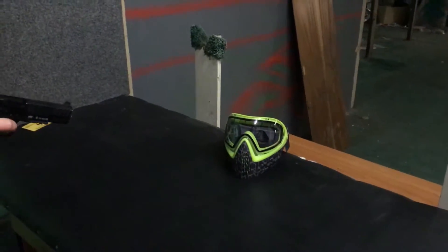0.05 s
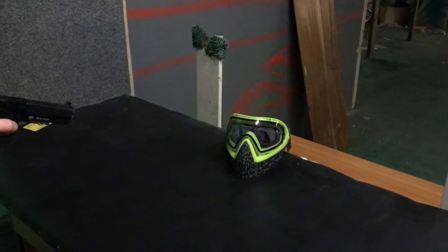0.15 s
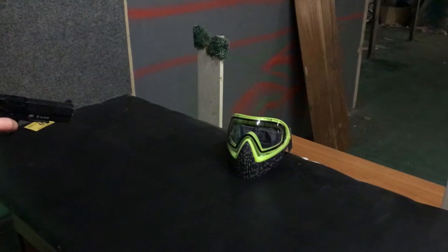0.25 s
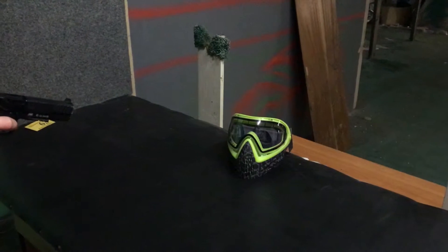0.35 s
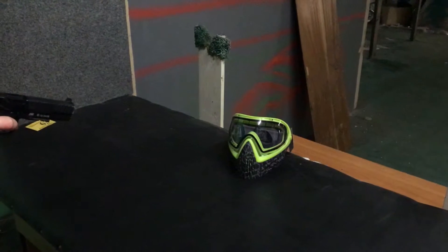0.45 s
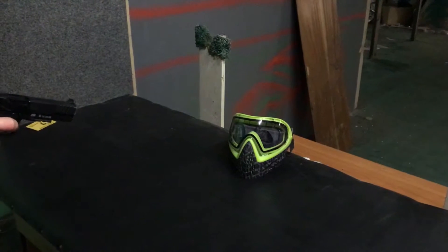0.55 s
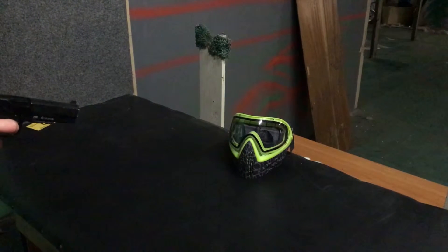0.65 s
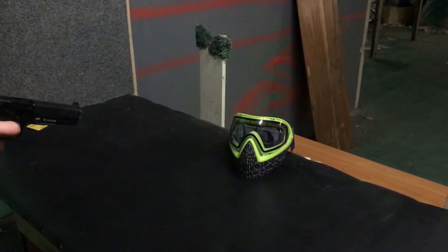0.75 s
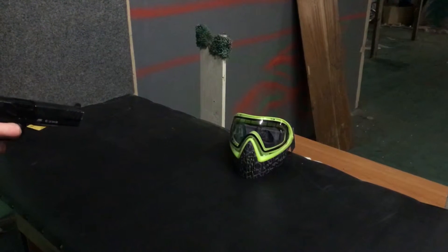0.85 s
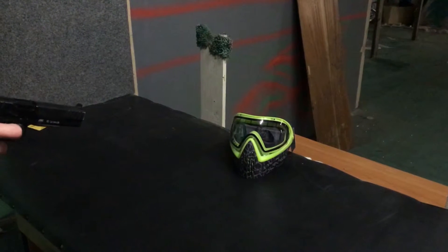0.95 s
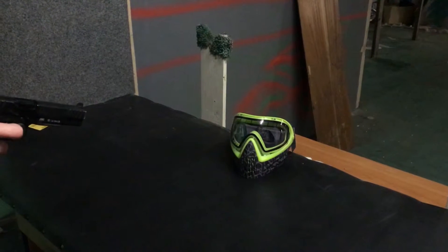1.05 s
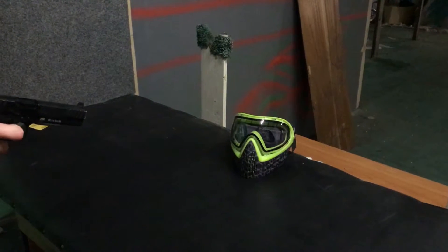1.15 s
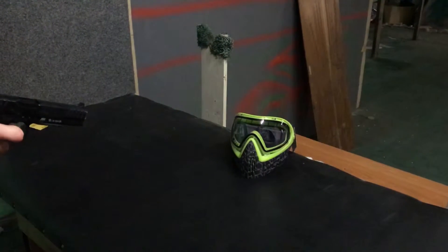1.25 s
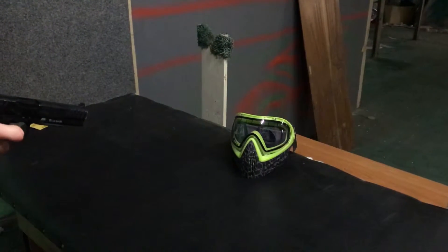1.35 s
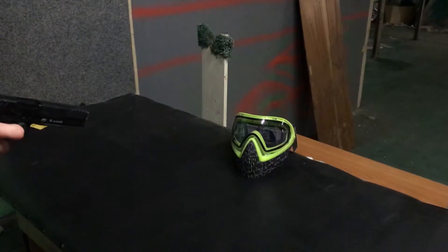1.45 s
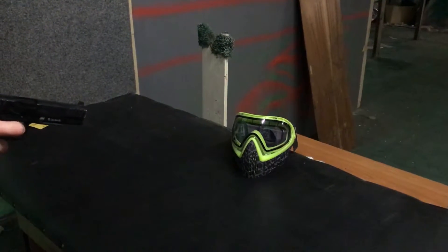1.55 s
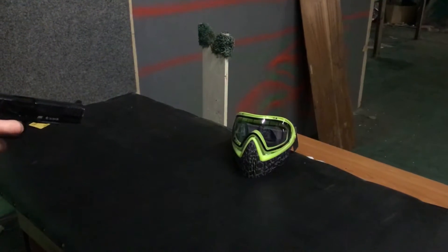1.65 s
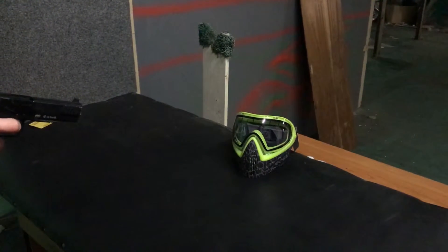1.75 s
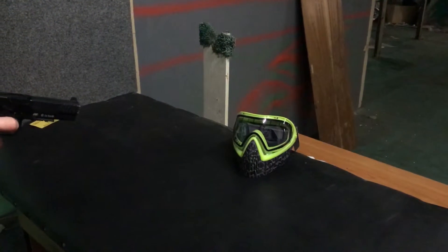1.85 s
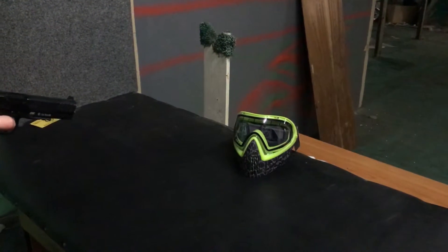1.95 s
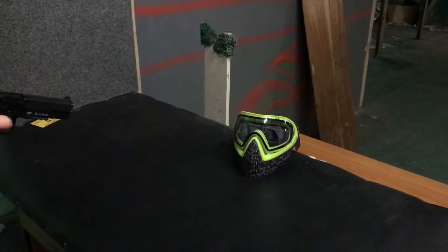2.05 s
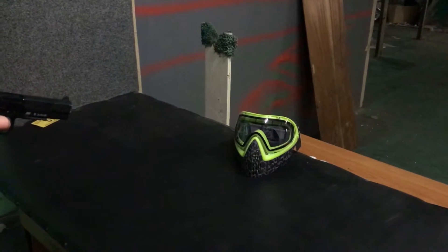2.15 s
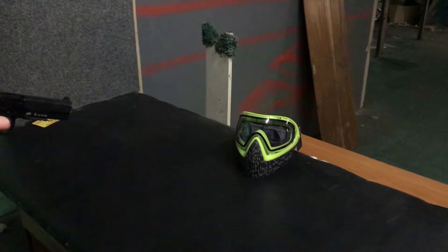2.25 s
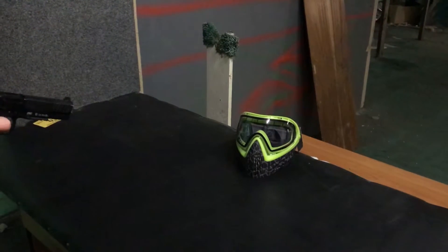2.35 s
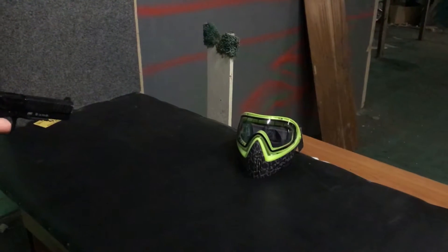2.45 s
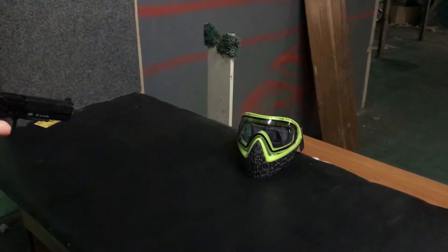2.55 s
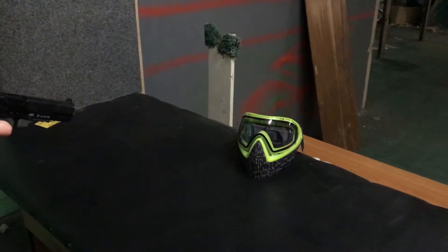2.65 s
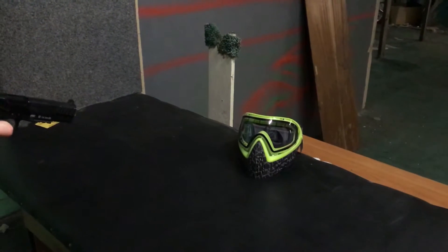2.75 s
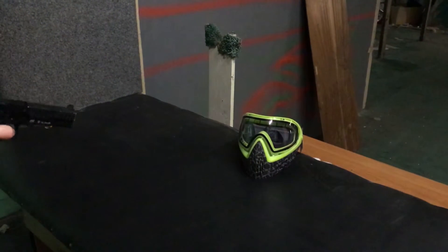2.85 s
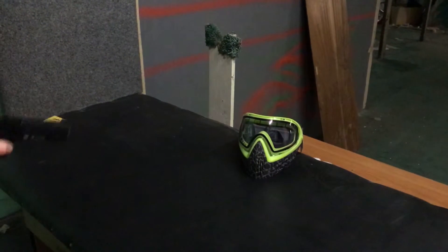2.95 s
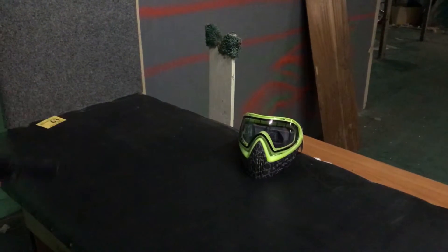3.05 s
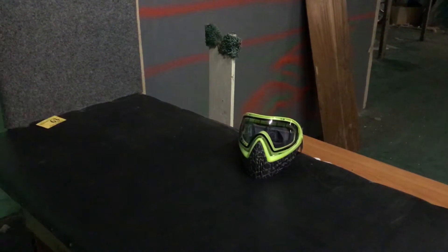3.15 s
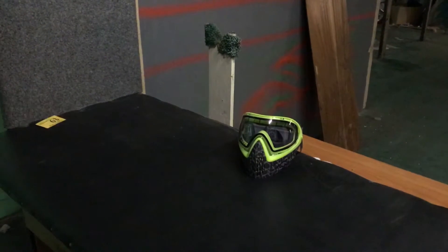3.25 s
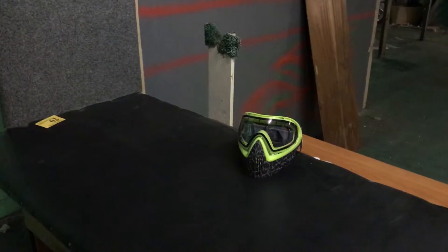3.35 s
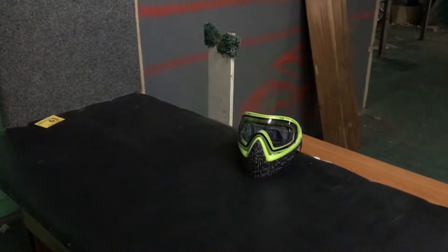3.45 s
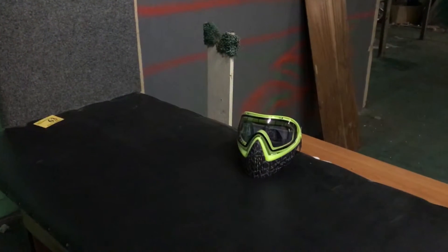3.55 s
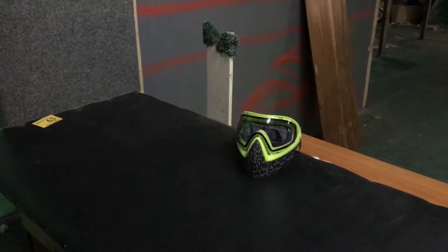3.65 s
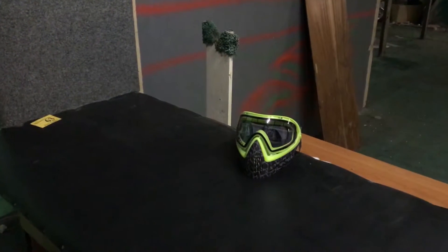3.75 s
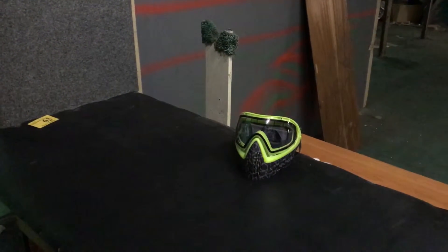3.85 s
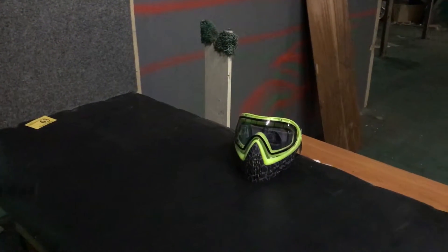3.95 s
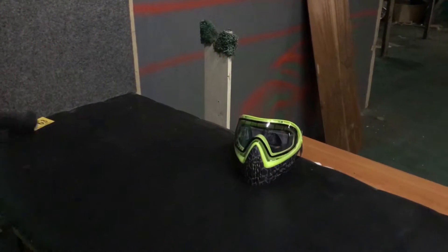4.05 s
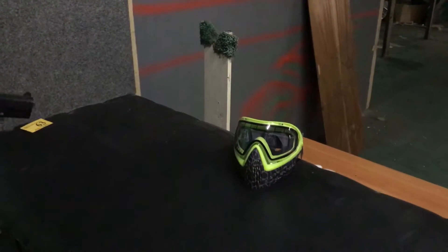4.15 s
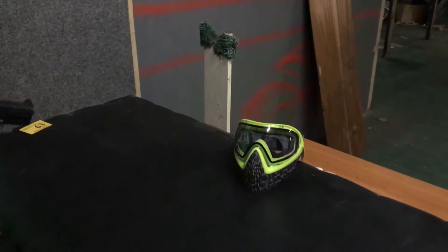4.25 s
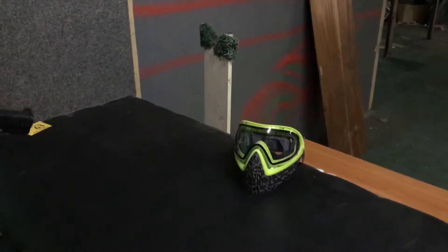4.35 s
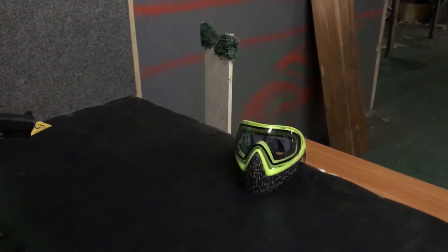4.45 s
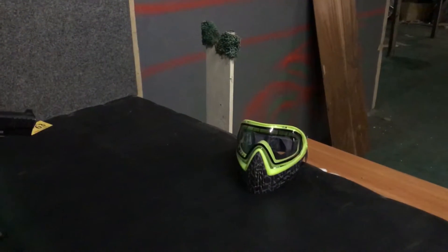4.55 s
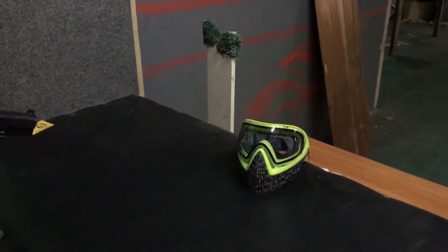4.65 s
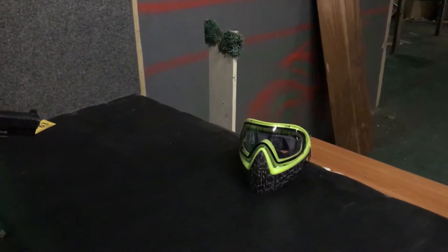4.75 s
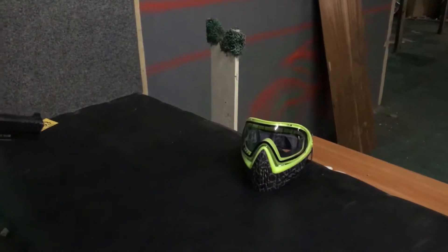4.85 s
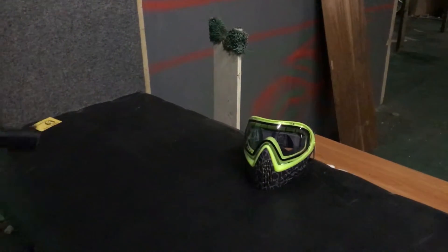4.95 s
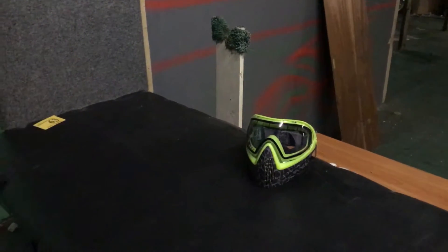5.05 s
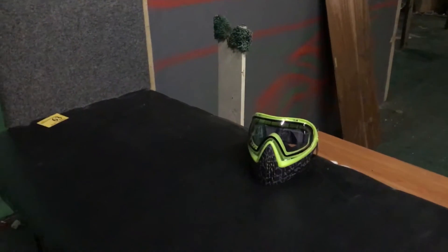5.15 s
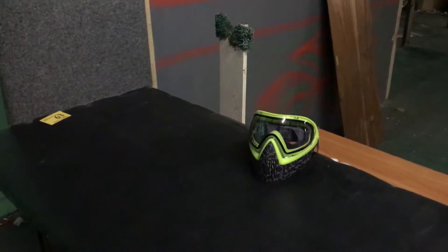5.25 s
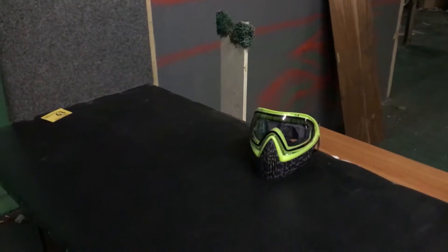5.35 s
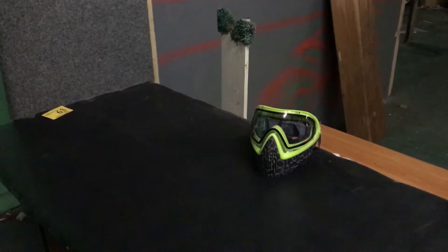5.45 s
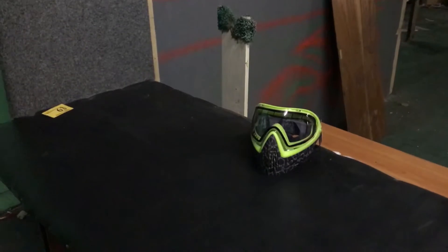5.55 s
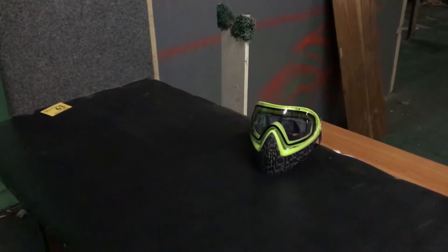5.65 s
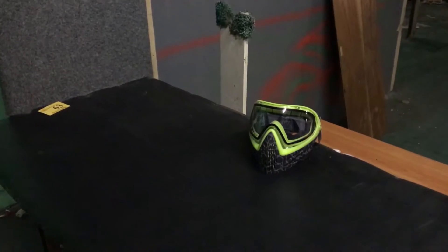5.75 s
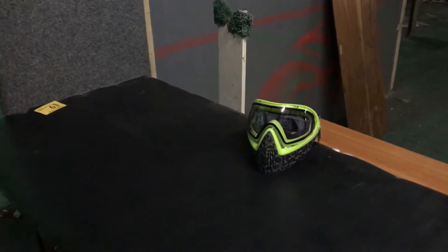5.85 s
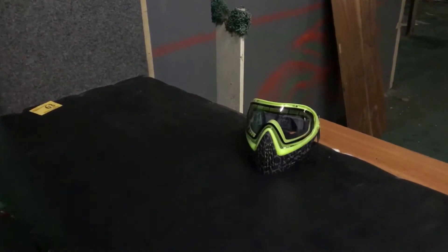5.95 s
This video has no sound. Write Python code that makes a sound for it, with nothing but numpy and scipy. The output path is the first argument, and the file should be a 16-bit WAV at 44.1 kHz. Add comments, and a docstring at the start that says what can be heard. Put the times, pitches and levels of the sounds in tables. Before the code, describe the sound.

As the echo of an earlier shot fades, a gas-powered toy pistol fires three times close to the microphone, with a longer pause before the last. Each shot is a sharp mechanical crack with a puff of gas and a low thump, echoing through an indoor hall. Pellets tick against distant things after each one. Faint trigger clicks and handling clacks fall between the shots, and a soft knock comes last, over a faint rumble and hiss.

```python
"""Gas pistol in an indoor range

A gas blow-back toy pistol fires three shots close by, while an earlier shot is still dying away.
Each is a quick run of hammer and slide impacts that ring the frame, with a jet of gas and a low thump;
the hall reverberates and its far end answers. Pellets tick against distant things, the pistol clacks in
the hand, the trigger clicks, and a soft knock sounds over a faint background rumble and hiss."""
import sys
import numpy as np
from scipy import signal
from scipy.fft import rfft, irfft
from scipy.io import wavfile
from scipy.ndimage import uniform_filter1d

SR = 44100
rng = np.random.default_rng(int(sys.argv[2]) if len(sys.argv) > 2 else 0)


def generate_wav(signal):
    """Clip the signal to [-1, 1] and save it as 16-bit WAV at the path in sys.argv[1]."""
    frames = np.transpose(np.atleast_2d(signal))
    scaled = np.clip(frames, -1, 1) * 32767
    pcm = np.round(scaled).astype(np.int16)
    wavfile.write(sys.argv[1], SR, pcm)


N = 264721
LEAD = int(.5 * SR)   # samples before time zero, to hold the earlier shot

# shots: t/s, crack level/dB, gas level/dB, barrel ring level/dB,
# thump level/dB, its first f/Hz, its final f/Hz, time constant of its fall/s
SHOTS = [(-0.42, -7.5, -9.5, -15, -17, 400, 46, .002), (1.3102, -9, -15.5, -15, -10.5, 545, 48, 0.0029),
         (2.6209, -9.5, -13, -20, -6.2, 801, 51.7, .0013),
         (4.695, -9.5, -14.5, -.5, -17, 189.6, 51.1, .0055)]
# spectrum of a small hard contact: f/Hz, spectral level/dB
TICK_SPECTRUM = [(100, -26), (300, -12.5), (600, -6.5), (1000, -2), (1500, 0), (2200, -0.5), (3000, 0.5),
                 (4000, 1.5), (5500, -2.5), (7500, -4.5), (10500, -8), (13000, -3.5), (16000, -15)]


def mechanism(body_db=-3, shove_db=-17, shove_s=.00022, jitter_s=.0003):
    """Impact excitation: each contact rattles and shoves the pistol, which rings in its normal modes."""
    # spectrum of the rattle: f/Hz, spectral level/dB
    crack_spectrum = [(60, -13), (200, -12), (500, -3.5), (800, -3), (1400, 1.5), (2800, 0.5), (4300, -2),
                      (6000, -0.5), (8000, -4.5), (9500, 0), (10500, -10.5), (12500, -1.5), (16000, -4.5)]
    # modes of frame and slide: f/Hz, bandwidth/Hz, level/dB
    frame_modes = [(240, 69, 12.5), (450, 44, 4.5), (554, 160, 0), (677, 28, 4.5), (1130, 60, -5),
                   (1213, 100, 2), (1770, 96, 11), (1800, 60, -3), (2140, 12, 0), (2676, 80, 7.5),
                   (3390, 100, 4), (3470, 190, -1), (3680, 40, 11), (4220, 64, 7.5)]
    rattles, shoves = np.zeros((2, LEAD + N))
    t = seconds(.02)
    push = t / shove_s * np.exp(1 - t / shove_s)
    for s, crack_db, *_ in SHOTS:
        for delay, db, t60 in firing_cycle():
            delay += jitter_s * rng.standard_normal()   # no two cycles run exactly alike
            add(rattles, s + delay, from_db(crack_db + db) * burst(t60))
            add(shoves, s + delay, from_db(crack_db + db + shove_db) * push)
    shoves = butterworth(shoves + 1e-18, 350, "high")   # so small a body radiates no deep bass
    return from_db(body_db) * resonate(colour(rattles, crack_spectrum) + shoves, frame_modes)


def firing_cycle():
    """Blow-back: the sear lets go, the hammer hits the valve, the slide scrapes, slams and rebounds."""
    sear = contacts(-.0224, gap_s=.0078, db=-32, step_db=9, t60=.022, count=3)
    hammer = contacts(.0006, gap_s=.0016, db=6.5, step_db=-.15, t60=.0037, count=2)
    rails = contacts(.0045, gap_s=.0083, db=-2, step_db=4, t60=.015, count=2)
    slide_stop = contacts(.0095, gap_s=.0098, db=5, step_db=-9, t60=.005, count=4)
    return sear + hammer + rails + slide_stop


def gas(delay_s=.011, rise_s=.002, t60=.17):
    """Jet noise: gas hisses out as the slide flies back, and excites the resonances of the barrel."""
    # spectrum of the jet: f/Hz, spectral level/dB
    jet_spectrum = [(60, -9), (300, -4), (800, -11.5), (1550, 2), (2000, 2.5), (2800, 4), (3350, 5.5),
                    (4200, 0), (5200, -2), (7500, -4), (9000, 0), (10500, -3.5), (12500, 0.5), (16000, -4)]
    # modes of the barrel: f/Hz, bandwidth/Hz, level/dB
    barrel_modes = [(1680, 280, -2), (3300, 260, -0.5)]
    jets = np.zeros(LEAD + N)
    for s, _, gas_db, ring_db, *_ in SHOTS:
        add(jets, s + delay_s, from_db(gas_db) * resonate(burst(t60, rise_s), barrel_modes, ring_db))
    return colour(jets, jet_spectrum)


def thump(delay_s=.0083, rise_s=.0016, length_s=.022):
    """Volume source: the expanding puff pushes the air in a few pressure swings that slow as they die."""
    out, t = np.zeros(LEAD + N), seconds(.2)
    swell = (1 - np.exp(-t / rise_s)) * np.exp(-(t / length_s) ** 2)
    for s, _, _, _, db, first_hz, final_hz, fall_s in SHOTS:
        hz = final_hz + (first_hz - final_hz) * np.exp(-t / fall_s)
        phase = 2 * np.pi * np.cumsum(hz) / SR
        add(out, s + delay_s, from_db(db) * swell * np.sin(phase))
    return out


def pellets(bass_tilt=-2.5, ricochet_t60=.0098):
    """Impact sound: a full strike sets distant metal ringing; a glancing one gives only a thin tick."""
    # full strikes: t/s, level/dB, hall send/dB, treble tilt/(dB/octave), ring level/dB, contact T60/s
    strikes = [(.2097, -26, -1, -1.7, -3, .016), (1.616, -25, .5, .2, -19, 0.01),
               (2.9767, -22, -5.5, 1.5, -10, 0.0089), (4.978, -18, -10.5, 1, -18, 0.0078)]
    # modes of the struck metal: f/Hz, bandwidth/Hz, level/dB
    metal_modes = [(4395, 350, 2.5), (5700, 440, 4.5), (6300, 260, 3)]
    # glancing strikes: t/s, level/dB, hall send/dB, treble tilt/(dB/octave)
    ricochets = [(.467, -40.5, -2, 10), (1.4205, -19.5, -10, -2), (1.748, -38, 3, 1),
                 (2.115, -47.5, -2.5, -2.5), (2.341, -54.5, 1, 5.5), (2.8117, -24, -2, -1),
                 (5.188, -35, 1, 5.5)]
    for s, db, hall_db, treble_tilt, ring_db, t60 in strikes:
        yield s, db, hall_db, resonate(tick(t60, bass_tilt, treble_tilt), metal_modes, ring_db)
    for s, db, hall_db, treble_tilt in ricochets:
        yield s, db, hall_db, tick(ricochet_t60, bass_tilt, treble_tilt)


def handling(touch_lead_s=.003, touch_db=-15.5, dulling_per_octave_db=-7):
    """Inelastic collision: a part touches, snaps home and settles in two weaker, duller rebounds."""
    # clacks: t/s, level/dB, hall send/dB, bass and treble tilts/(dB/octave), contact T60/s
    clacks = [(3.726, -53.5, 9.5, -23, 2, 0.039), (4.0314, -34, 2, -3.5, -1.5, 0.0057),
              (5.6644, -26.5, 2.5, -1, 1.1, 0.0085)]
    for start, snap_db, hall_db, bass_tilt, treble_tilt, t60 in clacks:
        yield start - touch_lead_s, snap_db + touch_db, hall_db, tick(t60, bass_tilt, treble_tilt)
        seating = contacts(start, gap_s=.0036, db=snap_db, step_db=-3, t60=t60, count=3)
        for k, (s, db, _) in enumerate(seating):
            yield s, db, hall_db, tick(t60, bass_tilt, treble_tilt + k * dulling_per_octave_db)


def trigger():
    """Modal ringing: the trigger creeps through its slack in fading clicks that excite its modes."""
    # pulls: t/s, first level/dB, click spacing/s, step per click/dB, hall send/dB, ring level/dB
    pulls = [(1.101, -50.5, .0115, -2.1, 4, -13), (1.2285, -55.5, .0055, -3, -13, -2),
             (2.4729, -49.5, .005, -1, -2.5, 2), (4.5403, -52, 0.012, -4.5, -11, -3.5)]
    # modes of the trigger: f/Hz, bandwidth/Hz, level/dB
    trigger_modes = [(980, 21, 29.5), (1220, 20, 18.5), (1450, 22, 24), (4260, 360, 0), (5570, 250, 2.5)]
    for start, first_db, gap_s, step_db, hall_db, ring_db in pulls:
        for s, db, t60 in contacts(start, gap_s, first_db, step_db, t60=.0049, count=4):
            click = colour(burst(t60), TICK_SPECTRUM, bass_tilt=-2, treble_tilt=1.5)
            yield s, db, hall_db, resonate(click, trigger_modes, ring_db)


def knock(hall_db=-3):
    """Damped transient: a soft knock with its energy at low frequencies."""
    # the knock: t/s, level/dB, T60/s
    knocks = [(5.895, -47, .16)]
    # its spectrum: f/Hz, spectral level/dB
    knock_spectrum = [(40, -9), (90, 12), (170, -14), (280, 8.5), (600, -2), (1200, -5.5), (3000, -44),
                      (12000, -62)]
    for s, db, t60 in knocks:
        yield s, db, hall_db, colour(burst(t60), knock_spectrum)


def hall(x, near_db, near_t60, tail_db, far_db, build_s=.011, far_s=.21, far_build_s=.0082):
    """Diffuse field: each band's energy scatters nearby, lingers, and swells back from the far end."""
    # reverberation of the hall: f/Hz, T60/s, tail level/dB, far-end level/dB
    reverberation = [(60, 0.71, -10.5, -26.5), (156, 2.4, -3.5, -8), (266, 1.8, -6, -9.5),
                     (453, 1.7, -13, -15), (780, 1.5, -7.5, -14), (1320, 1.3, -4.5, -9),
                     (1700, 1.305, -3.5, -8.5), (2370, 1.22, -2.5, -6.5), (3380, 1.09, -3, -10.5),
                     (5950, .85, -3.5, -12), (10200, 0.45, -3.5, -18.5), (16000, .55, -10, -29.5)]
    hz, *columns = np.transpose(reverberation)
    block = 32   # samples per step of the energy envelope
    t, starts = seconds(2)[::block], np.arange(0, len(x), block)
    late = np.maximum(t - far_s, 0)
    edges_hz = np.concatenate([np.geomspace(45, 1000, 7)[:-1], np.geomspace(1000, 17000, 19)])
    white = rng.standard_normal((2, len(x)))
    # single reflections stand out of the wash, at the same moments in every band
    echoes_db = 2.5 * rms_one(uniform_filter1d(rng.standard_normal(len(t)), size=3))
    echoes = rms_one(from_db(echoes_db))
    near = from_db(-60 * t / near_t60) * (t > .002)
    out = np.zeros(len(x))
    for k, band in enumerate(zip(edges_hz, edges_hz[1:])):
        log_centre = np.mean(np.log(band))
        t60, band_tail_db, band_far_db = [np.interp(log_centre, np.log(hz), c) for c in columns]
        tail = from_db(-60 * t / t60) * (1 - np.exp(-t / build_s))
        far = from_db(-60 * late / t60) * np.sqrt(1 - np.exp(-late / far_build_s))
        paths = [(near_db, near), (tail_db + band_tail_db, tail), (far_db + band_far_db, far)]
        energy_decay = sum((from_db(db) * shape / np.linalg.norm(shape)) ** 2 for db, shape in paths)
        source, wash = butterworth([x + 1e-9 * white[0], white[k % 2]], band, "band")
        source_power = np.add.reduceat(source ** 2, starts) / block
        field_power = signal.fftconvolve(source_power, energy_decay * echoes ** 2)
        envelope = np.repeat(np.sqrt(np.abs(field_power)), block)[:len(x)]
        out += envelope * rms_one(wash)
    return out


def background(crossover_hz=402, hiss_db=-63.2, waver_db=2, waver_s=.065):
    """Noise floor: a low background rumble that rises, falls and wavers under a faint, steady hiss."""
    # spectrum of the background: f/Hz, spectral level/dB
    floor_spectrum = [(15, -43), (25, -16), (59, -6), (99, -6.5), (363, -23), (476, -26.5), (560, -21.5),
                      (624, -34), (695, -25), (796, -32), (1130, -31.5), (8140, -44), (13600, -40.5),
                      (16000, -45)]
    # course of the rumble: t/s, level/dB
    rumble_levels = [(0, -62.5), (1, -69), (2, -60.5), (3.1, -64), (3.4, -58.5), (4.2, -63.5), (5.5, -62),
                     (6, -58)]
    noises = [colour(noise, floor_spectrum) for noise in rng.standard_normal((2, LEAD + N))]
    rumble = butterworth(noises[0], crossover_hz, "low")[LEAD:]
    hiss = butterworth(noises[1], crossover_hz, "high")[LEAD:]
    t = np.arange(N) / SR
    steps = np.arange(0, t[-1], waver_s)
    waver = np.interp(t, steps, rng.standard_normal(len(steps)))
    rumble_db = np.interp(t, *np.transpose(rumble_levels)) + waver_db * waver
    return from_db(rumble_db) * rumble + from_db(hiss_db) * hiss


def contacts(start_s, gap_s, db, step_db, t60, count):
    """Impact train, evenly stepped in time and level: rows of t/s, level/dB, T60/s."""
    return [(start_s + k * gap_s, db + k * step_db, t60) for k in range(count)]


def tick(t60, bass_tilt, treble_tilt):
    """Brief impact: one small hard contact radiates a broad spectrum."""
    return colour(burst(t60, rise_s=.00032), TICK_SPECTRUM, bass_tilt, treble_tilt)


def burst(t60, rise_s=0):
    """Exponential decay of noise with an even spectrum: a rattling contact when short, a jet when long."""
    t = seconds(.61)
    shape = from_db(-60 * t / t60) * (1 - np.exp(-(t + 1 / SR) / (rise_s + 1e-9)))
    phases = np.angle(rfft(shape * rng.standard_normal(len(t))))
    even = irfft(np.exp(1j * phases), len(t))
    rush = even * shape ** (1 / 4)   # a flat spectrum smears the burst in time: taper it
    return rush * np.linalg.norm(shape) / np.linalg.norm(rush)


def resonate(x, modes, ring_db=0):
    """Modal superposition: the sound itself plus the damped resonances it excites."""
    out = x.copy()
    for hz, width, db in modes:
        radius = np.exp(-np.pi * width / SR)
        poles = [1, -2 * radius * np.cos(2 * np.pi * hz / SR), radius ** 2]
        ring = (1 - radius ** 2) / 2 * signal.lfilter([1, 0, -1], poles, x + 1e-18)
        out += from_db(db + ring_db) * ring
    return out


def colour(x, spectrum, bass_tilt=0, treble_tilt=0):
    """Minimum-phase filter of unit power gain; the tilts add dB per octave away from 2 kHz."""
    size = 4096
    octave = np.log2(np.maximum(np.arange(size // 2 + 1), 1) * SR / size / 2000)
    hz, db = np.transpose(spectrum)
    level_db = np.interp(octave, np.log2(hz / 2000), db)
    tilt_db = np.where(octave < 0, -bass_tilt, treble_tilt) * octave
    cepstrum = irfft(np.log(from_db(level_db + tilt_db)))
    response = irfft(np.exp(rfft(2 * cepstrum[:size // 2], size)))
    return signal.fftconvolve(x, response / np.linalg.norm(response))[:len(x)]


def butterworth(x, hz, kind):
    """Maximally flat low-, high- or band-pass filter."""
    return signal.sosfilt(signal.butter(2, hz, kind, fs=SR, output="sos"), x)


def from_db(db):
    """Level to amplitude ratio."""
    return 10 ** (np.asarray(db) / 20)


def rms_one(x):
    """Normalisation to unit rms."""
    return x / np.sqrt(np.mean(x ** 2) + 1e-20)


def seconds(length):
    """Sampled time axis."""
    return np.arange(int(length * SR)) / SR


def add(track, s, sound):
    """Superposition at time s, on a track that begins LEAD samples before zero."""
    i = LEAD + int(round(s * SR))
    track[i:i + len(sound)] += sound[:len(track) - i]


def scene():
    """Directivity: the pistol points down the hall, so the far end answers shots more than small sounds."""
    shots = mechanism() + gas()
    direct, sent = np.zeros((2, LEAD + N))
    for s, db, hall_db, sound in [*pellets(), *handling(), *trigger(), *knock()]:
        add(direct, s, from_db(db) * sound)
        add(sent, s, from_db(db + hall_db) * sound)
    pistol = shots + thump() + hall(shots, near_db=-9, near_t60=.14, tail_db=-4, far_db=-6)
    small_sounds = direct + hall(sent, near_db=1, near_t60=.21, tail_db=3, far_db=-13.5)
    return ((pistol + small_sounds)[LEAD:] + background())[None]


def record(dry):
    """Limiting and band limiting: a limiter rounds the highest peaks; the top treble is cut."""
    overload, cutoff_hz = .8, 16000
    rounded = overload * np.tanh(dry / overload)
    return signal.sosfilt(signal.ellip(10, .2, 80, cutoff_hz, fs=SR, output="sos"), rounded)


dry = scene()
out = record(dry)
generate_wav(out)
```